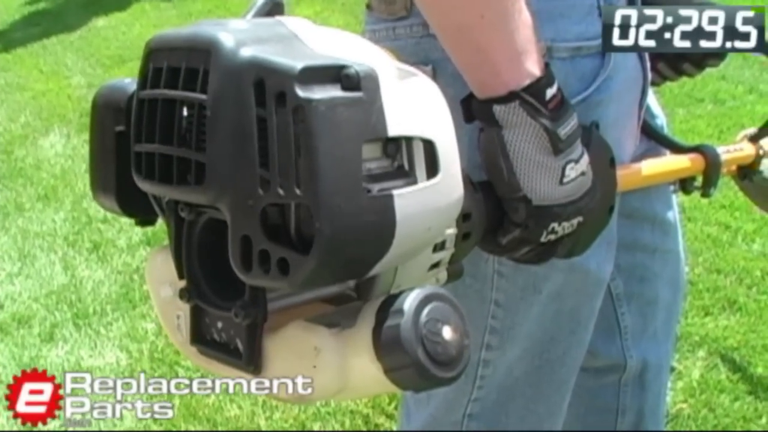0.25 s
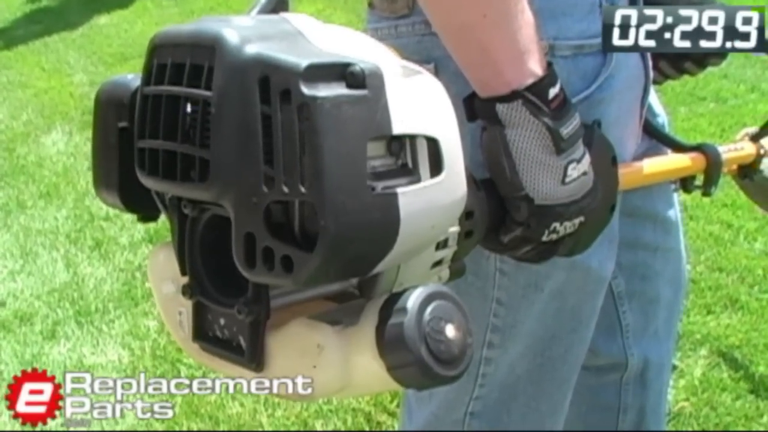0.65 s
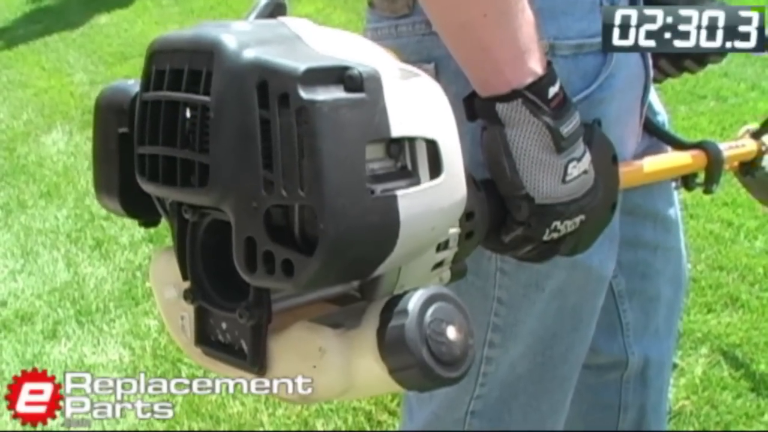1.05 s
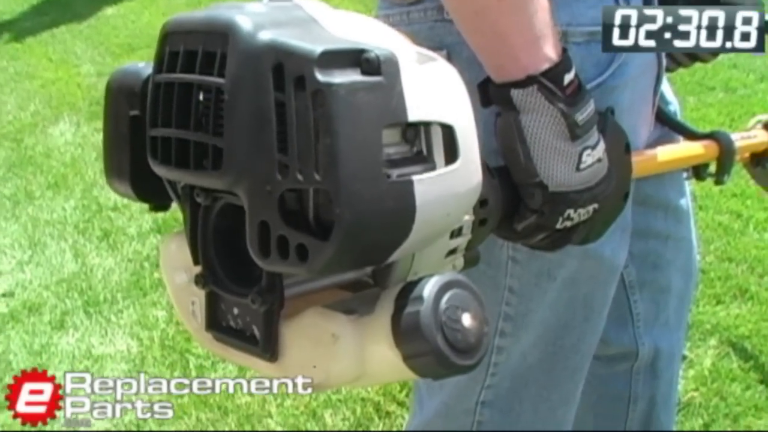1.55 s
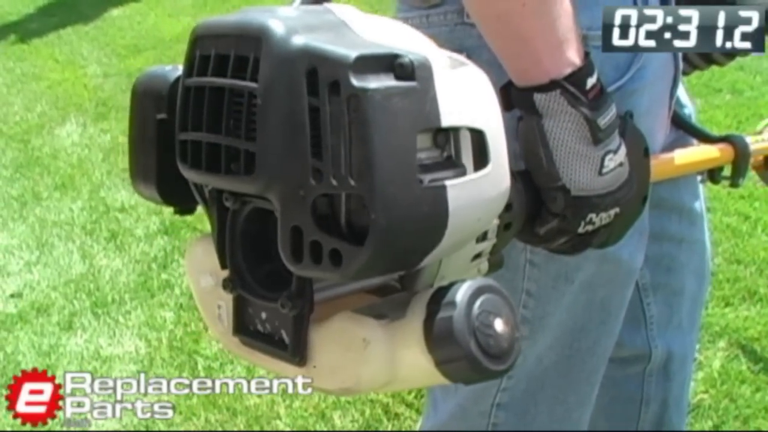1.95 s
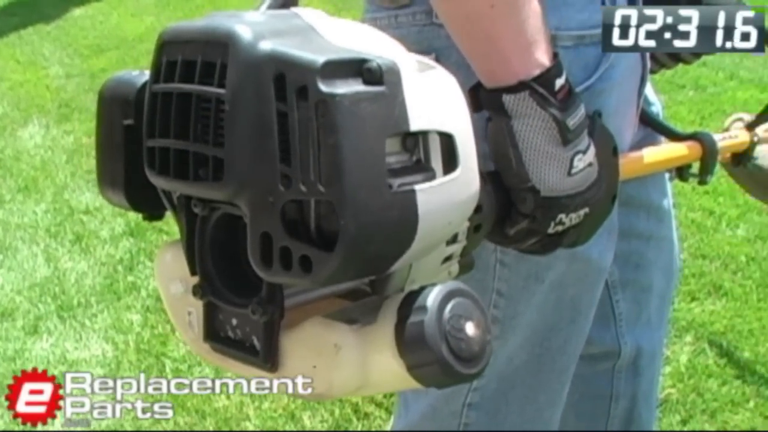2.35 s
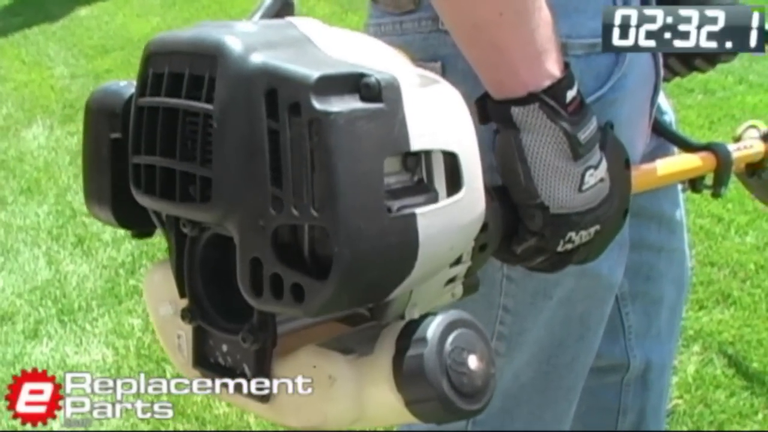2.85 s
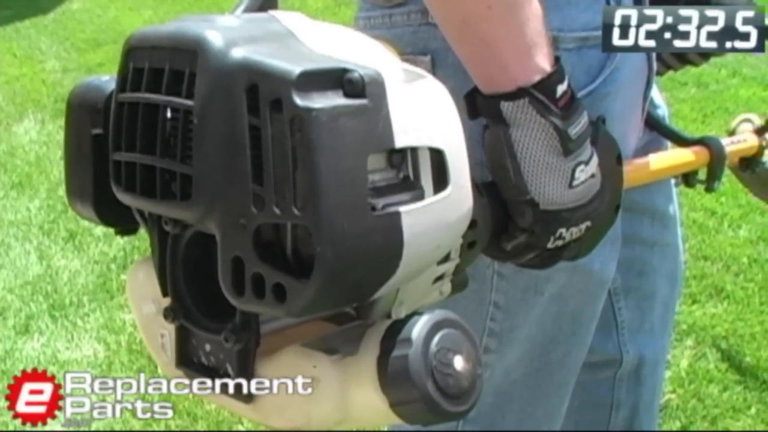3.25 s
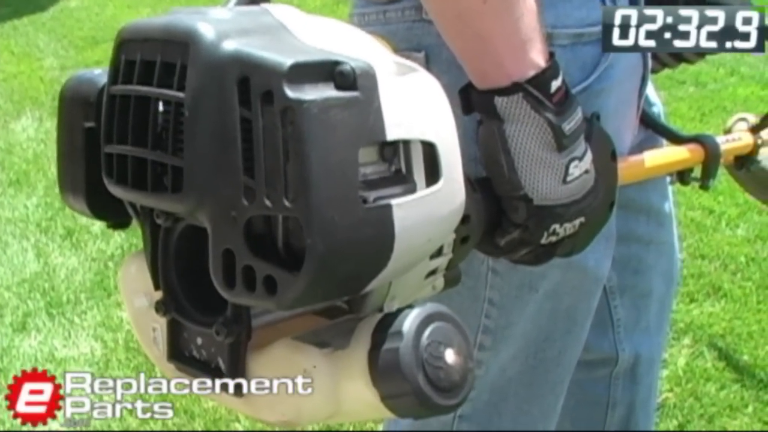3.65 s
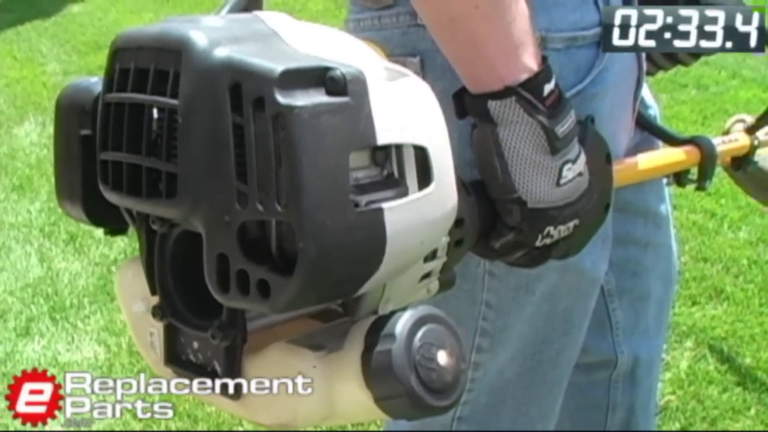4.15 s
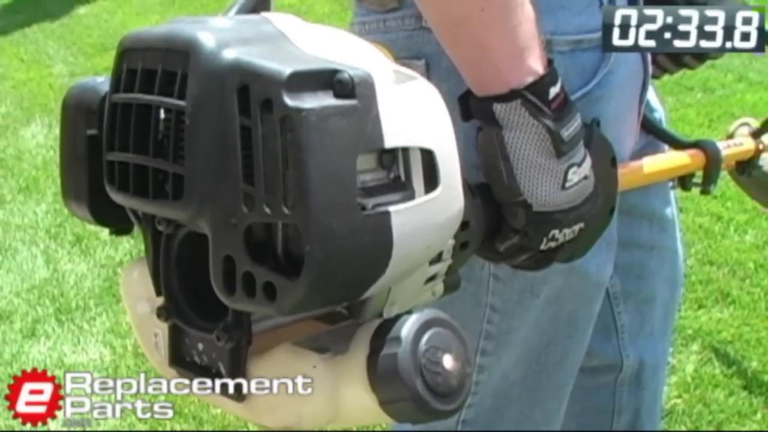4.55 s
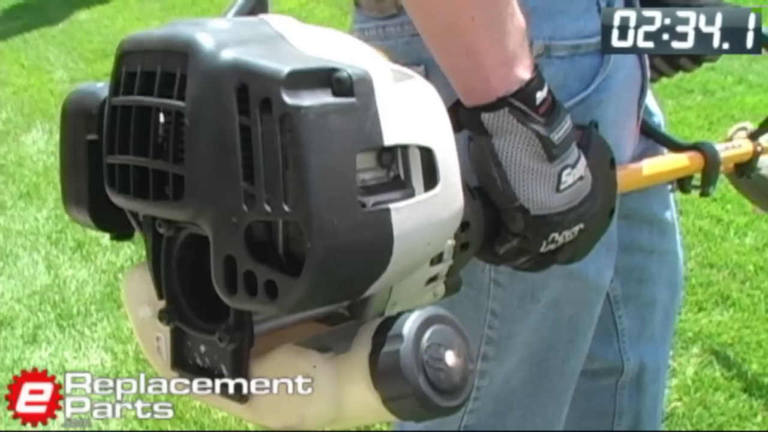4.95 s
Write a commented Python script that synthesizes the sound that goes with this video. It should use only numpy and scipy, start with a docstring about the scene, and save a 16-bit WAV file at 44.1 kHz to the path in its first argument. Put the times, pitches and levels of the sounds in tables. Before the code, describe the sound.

A string trimmer runs with a raspy drone outdoors, slows a little, then cuts out and clatters to a halt.

```python
"""A hand-held two-stroke trimmer runs on a lawn, close to a camera. Each turn gives a steep-fronted exhaust
pulse, a rush of gas and knocks that ring the crankcase and its plastic shroud. The muffler spits, the
speed sags and the cooling fins sing. Switched off, the engine rattles, coasts down against friction and
stops with a kick. In the quiet afterwards a hand shifts on the grip, and the camera's gain control
brings up the distant outdoor hum."""
import sys
import numpy as np
from scipy import signal
from scipy.fft import rfft, irfft
from scipy.io import wavfile
from scipy.ndimage import uniform_filter1d, minimum_filter1d

SR = 44100
rng = np.random.default_rng(int(sys.argv[2]) if len(sys.argv) > 2 else 0)


def log_audio(samples):
    """Write samples as a 16-bit WAV file to the path given in sys.argv[1]."""
    # one column per channel
    frames = np.atleast_2d(samples).T
    # limit to full scale, then quantise
    limited = np.clip(frames, -1, 1)
    pcm = np.round(limited * 32767).astype(np.int16)
    wavfile.write(sys.argv[1], SR, pcm)


N = 229757
TIME = np.arange(N) / SR
FFT_SIZE = 16384
FREQ = np.arange(FFT_SIZE // 2 + 1) * SR / FFT_SIZE
SWITCH_OFF_S, STOP_S = 4.14, 4.716


def undb(db):
    """Amplitude ratio of a level in decibels."""
    return 10 ** (np.asarray(db) / 20)

def unit(x):
    """Normalisation to an rms of 1."""
    return x / np.sqrt(np.mean(x ** 2))

def ramp(start_s, length_s):
    """Linear rise from 0 to 1."""
    return np.clip((TIME - start_s) / length_s, 0, 1)

def spectrum(points):
    """Interpolation of (f/Hz, level/dB) points on a logarithmic frequency axis."""
    hz, db = np.transpose(points)
    return np.interp(np.log(FREQ + 1), np.log(hz + 1), db)

def causal(db):
    """Minimum phase: the response with these levels that rings only after it is struck."""
    cepstrum = irfft(np.log(undb(db)))
    half = len(cepstrum) // 2
    cepstrum[1:half] *= 2
    cepstrum[half + 1:] = 0
    return np.exp(rfft(cepstrum))

def modes(table):
    """Modal superposition: the summed response of damped resonators."""
    return sum(undb(db) * 1j * FREQ * width / (hz ** 2 - FREQ ** 2 + 1j * FREQ * width)
               for hz, width, db in table)

def band(low_hz, top_hz):
    """Band-pass response: first order below, second order above."""
    return 1j * FREQ / (low_hz + 1j * FREQ) / (1 + (FREQ / top_hz) ** 2)

def filtered(x, response, lead=512):
    """Convolution of a sound with the impulse response of a filter."""
    taps = np.roll(irfft(response), lead, axis=-1)
    return signal.oaconvolve(np.atleast_2d(x), np.atleast_2d(taps), axes=-1)[:, lead:lead + N]

def stereo_noise(apart, count=N):
    """Partial coherence: common noise plus a share of opposite sign in the two channels."""
    mid, side = rng.standard_normal((2, count))
    return mid + apart * side * np.array([[1], [-1]])

def decay(t60):
    """Exponential decay by 60 dB in t60 seconds."""
    return np.exp(-np.log(1000) * TIME[:FFT_SIZE] / t60)

def bursts(table, t60, apart):
    """Transient noise: a sharp onset at each (t/s, level/dB), then exponential decay."""
    envelope = np.zeros(N + FFT_SIZE)
    for onset_s, db in table:
        start = int(onset_s * SR)
        envelope[start:start + FFT_SIZE] += undb(db) * decay(t60)
    return stereo_noise(apart) * envelope[:N]

def clicks(times, sizes):
    """Band-limited impulses: windowed sinc pulses, placed between the samples."""
    centres = np.asarray(times)[:, None] * SR
    taps = centres.astype(int) + np.arange(-7, 9)
    pulses = sizes[:, None] * np.sinc(taps - centres) * np.sinc((taps - centres) / 9)
    out = np.zeros(N)
    np.add.at(out, np.clip(taps, 0, N - 1), pulses)
    return out

def scatter(t60, apart):
    """All-pass scattering: dense, brief reflections smear a click without colouring it."""
    tail = rfft(stereo_noise(apart, count=FFT_SIZE) * decay(t60))
    return tail / np.abs(tail)

def passages(turns, angle):
    """Cyclic variation: the times the crank passes an angle, with random deviates of timing and level."""
    times = np.interp(np.arange(int(turns[-1])) + angle, turns, TIME)
    times = times[times < STOP_S]
    shift, size = rng.standard_normal((len(times), 2)).T
    return times, shift, size


# spectrum of the outdoor background: f/Hz, level/dB
AMBIENT_SPECTRUM = [(30, -44), (80, -17), (130, -12.5), (180, -3), (300, -8.5), (700, -9), (1200, -7),
                    (1800, -14), (4000, -14), (7400, -16.5), (12000, -28.5), (16000, -42)]
def outdoors(level_db=-49.5):
    """Ambient noise: distant hum and hiss, with a slight random amplitude modulation."""
    flutter_db = unit(uniform_filter1d(rng.standard_normal(N), size=900))
    hum = filtered(stereo_noise(apart=0.35), undb(spectrum(AMBIENT_SPECTRUM)))
    return unit(hum) * undb(level_db + flutter_db)

# shifts of the hand on the grip: t/s, level/dB
GRIP_SHIFTS = [(4.923, -39), (5.118, -66), (5.138, -43), (5.19, -43)]
def rustles():
    """Friction noise: the hand rustles faintly, in the same broad band as the gas."""
    return filtered(bursts(GRIP_SHIFTS, t60=0.097, apart=0.62), undb(spectrum(GAS_SPECTRUM)))

# lightly damped modes of the cooling fins: f/Hz, bandwidth/Hz, level/dB
FIN_MODES = [(1838, 30, 0), (1816, 6, -4), (4325, 7, -10), (4646, 14, -17)]
def fins(turns, hz, critical_hz=113.9, width_hz=1.15, critical_db=4, jitter_s=3e-5, rough_db=2.1):
    """Resonance: the fins sing when a harmonic of the crank meets a mode, and after the hardest kick."""
    times, shift, size = passages(turns, angle=0.3448)
    # near the critical speed the engine shakes in sympathy and strikes them harder
    sympathy = np.exp(-((np.interp(times, TIME, hz) - critical_hz) / width_hz) ** 4)
    blows = clicks(times + jitter_s * shift, undb(critical_db * sympathy + rough_db * size))
    kick_s, kick_db = max(PISTON_KICKS, key=lambda kick: kick[1])
    blows += clicks([kick_s], undb([kick_db + 13]))
    return unit(filtered(blows, modes(FIN_MODES))) * undb(-33.3)

# spits of the muffler: t/s, level/dB
MUFFLER_SPITS = [(0.6335, -17), (0.8445, -13), (1.297, -12), (1.6344, -11), (1.6756, -12), (1.9235, -12),
                 (1.9325, -11), (1.9929, -12), (2.0944, -15)]
def spits():
    """Transient jet noise: short bright bursts leave the muffler outlet."""
    return filtered(bursts(MUFFLER_SPITS, t60=.03, apart=.4), band(4000, 12000)) * undb(-2.5)

# modes of the loose parts: f/Hz, bandwidth/Hz, level/dB
LOOSE_MODES = [(1340, 350, 2.5), (1880, 62, -6), (3510, 120, -3), (4560, 220, -3), (5380, 150, -2),
               (11500, 560, -15)]
def rattle(turns, angle=.35, settle_turns=0.5, steady=0.6, jitter_s=3e-5, rough_db=1.5):
    """Impacts across a clearance: as firing falters, loose parts clack once a turn, chatter and settle."""
    times, shift, size = passages(turns, angle)
    ring = modes(LOOSE_MODES)
    impacts = clicks(times + jitter_s * shift, undb(rough_db * size))
    clack = filtered(impacts, ring * scatter(t60=.012, apart=.3))
    settling = steady + np.exp(-((turns - angle) % 1) / settle_turns)
    chatter = filtered(stereo_noise(apart=0.25) * settling, ring)
    return unit(unit(clack) + undb(-3) * unit(chatter)) * undb(-24.5) * ramp(SWITCH_OFF_S, .1)

# last blows of the piston: t/s, level/dB
PISTON_KICKS = [(4.709, -6), (4.727, -5), (4.74, -16)]
def kicks(body):
    """Air-spring rebound: the piston rocks back from compression, shaking loose parts and casing."""
    response = undb(-9) * modes(LOOSE_MODES) + undb(-24) * body * causal(spectrum(GAS_SPECTRUM))
    return filtered(bursts(PISTON_KICKS, t60=0.11, apart=0.27), response)

# modes of crankcase and shroud: f/Hz, bandwidth/Hz, level/dB
CASING_MODES = [(1447, 290, -1), (2570, 153, 1.5), (3294, 36, -1), (3713, 220, -6.5), (4280, 86, -8),
                (5380, 24, 5), (5720, 310, -2.5), (6800, 280, 3), (7280, 49, 6.5), (9170, 60, 6),
                (11270, 260, 3), (11860, 330, -14)]
def casing():
    """Structural resonance: the modes of the casing add to the direct sound."""
    return 1 + modes(CASING_MODES)

# knocks of piston, rings and clutch: crank angle/turns, level/dB
KNOCK_ANGLES = [(0.192, -17.5), (0.348, -2), (.45, 5), (0.556, -3), (0.799, 4), (.93, -7)]
# spectrum of a knock: f/Hz, level/dB
KNOCK_SPECTRUM = [(100, -61), (700, -16), (1200, -14.5), (1600, -1), (2100, 0.5), (3000, -1.5), (4500, 1.5),
                  (6000, -7.5), (8000, -22.5), (12000, -30), (16000, -14)]
def knocks(turns, firing, body, jitter_s=1.8e-5, loose_s=1e-5, rough_db=1.5):
    """Impact excitation: each knock takes its own path through the shroud; unfired, its timing loosens."""
    response = body * causal(spectrum(KNOCK_SPECTRUM))
    out = 0
    for angle, db in KNOCK_ANGLES:
        times, shift, size = passages(turns, angle)
        slack_s = jitter_s + loose_s * (1 - np.interp(times, TIME, firing))
        impacts = clicks(times + slack_s * shift, undb(db + rough_db * size))
        out = out + filtered(impacts, response * scatter(t60=0.0061, apart=0.24))
    return unit(out)

# spectrum of the rushing gas: f/Hz, level/dB
GAS_SPECTRUM = [(30, -16.5), (90, -23.5), (200, -22.5), (350, -16.5), (600, -13.5), (1000, 1), (1500, -3.5),
                (2200, -3.5), (4000, 0.5), (6000, -3), (8000, -7), (10000, -9.5), (12000, -9), (16000, -27)]
def gas(turns, body, open_angle=0.3, open_turns=0.25, fan=0.48, rough_db=1.5):
    """Turbulence: gas rushes out while the port is open, over the steady hiss of the cooling fan."""
    puff = np.exp(-(np.sin(np.pi * (turns - open_angle)) / (np.pi * open_turns)) ** 2)
    size = undb(rough_db * rng.standard_normal(int(turns[-1]) + 1))[turns.astype(int)]
    flow = stereo_noise(apart=0.37) * (fan + puff * size)
    return unit(filtered(flow, body * causal(spectrum(GAS_SPECTRUM))))

def shock(turns, firing, jitter_s=5e-5, rough_db=4.5):
    """Nonlinear steepening: the front of each firing pulse is a narrow spike of varying height."""
    times, shift, size = passages(turns, angle=.185)
    spikes = clicks(times + jitter_s * shift, undb(rough_db * np.minimum(size, 1.6)))
    return unit(filtered(spikes * firing, band(900, 3000)))

# crank speed when coasting, sagging and fast: f/Hz
STATE_SPEEDS = [96, 113, 122]
# exhaust harmonics: order, then level/dB when coasting, sagging and fast
EXHAUST_HARMONICS = [(1, -36, -16, -14), (2, -16, -10.5, -17.5), (3, -13, -7.5, -4.5), (4, -12, -9.5, -10),
                     (5, -8, -3, -1), (6, -11, -7, -7), (7, -17, -6.5, -2), (8, -13, -0.5, 0),
                     (9, -9, -7, -6), (10, -14, -13, -10), (11, -7, -3.5, -11), (12, -12, -3.5, -12),
                     (13, -11, -8, -21), (14, -13, -17, -13)]
def exhaust(turns, hz, firing, delay_turns=.05, dispersion_turns=.008, rough_db=.6):
    """Dispersion: the muffler lets the lows out first, so each turn's pulse is a short upward chirp."""
    deviates = rng.standard_normal((int(turns[-1]) + 2, 2))
    size, shift = (np.interp(turns, np.arange(len(d)), d) for d in deviates.T)
    jitter_turns = (.0015 + .004 * (1 - firing)) * shift
    # minimum phase of the sagging spectrum, extended by a falling tail
    sagging_db = np.transpose(EXHAUST_HARMONICS)[2]
    phase = np.unwrap(np.angle(causal(np.r_[-30, sagging_db, np.linspace(-14, -40, num=34)])))
    out = 0
    for order, *levels in EXHAUST_HARMONICS:
        angle = turns + jitter_turns - delay_turns - dispersion_turns * order
        amplitude = undb(np.interp(hz, STATE_SPEEDS, levels))
        out = out - amplitude * np.cos(2 * np.pi * order * angle + phase[order])
    return unit(out * undb(rough_db * size))

# crank speed while the engine fires: t/s, f/Hz
CRANK_SPEED = [(0.05, 123.4), (0.28, 123.7), (0.43, 121.8), (1.01, 123.7), (1.16, 123.7), (1.34, 122.1),
               (1.39, 122.4), (1.7, 120.0), (1.84, 116.0), (1.93, 115.0), (2.18, 114.1), (2.37, 115.2),
               (2.48, 114.6), (2.66, 110.8), (2.87, 112.2), (3.09, 111.9), (3.37, 114.0), (4.12, 112.7)]
def crank(dying_s=.22, friction_hz_per_s=123):
    """Dry friction: once the firing has died away, a constant torque slows the crank at a steady rate."""
    coasting = ramp(SWITCH_OFF_S, dying_s)
    hz = np.interp(TIME, *np.transpose(CRANK_SPEED)) - friction_hz_per_s * np.cumsum(coasting) / SR
    return np.maximum(hz, np.interp(STOP_S, TIME, hz)), 1 - coasting

# left microphone port relative to right: f/Hz, phase lead/rad
PHASE_DIFFERENCE = [(0, 0), (950, 0.7), (1980, 0.4), (3790, 0.6), (5080, 0.3), (5600, -0.1), (6200, 0.0),
                    (7320, -0.4), (8270, -0.3), (9990, 0.5), (10200, 0.5), (12400, 0.7), (13600, 0.2),
                    (15600, 0.0)]
# left microphone port relative to right: f/Hz, level/dB
LEVEL_DIFFERENCE = [(60, 0.5), (110, 0.5), (200, 0.0), (380, 0.0), (700, -0.5), (1290, -0.5), (2380, 0.5),
                    (4400, 2.5), (8120, -0.5), (15000, -1.5)]
def microphones(x):
    """Path difference: a near source reaches the two microphone ports with unequal phase and level."""
    lead = np.interp(FREQ, *np.transpose(PHASE_DIFFERENCE))
    half = (1j * lead + np.log(undb(spectrum(LEVEL_DIFFERENCE)))) / 2
    return filtered(x, np.exp(np.array([half, -half])))

def scene(pumping_hz=71):
    """Superposition: the crank drives the engine's layers until it stops, over the outdoor hum."""
    hz, firing = crank()
    turns = np.cumsum(hz) / SR
    _, sagging_hz, fast_hz = STATE_SPEEDS
    # as the engine sags and labours, the exhaust swells, its front softens and the knocks harden
    sag = np.interp(hz, [sagging_hz, fast_hz], [1, 0])
    # below pumping_hz the piston pumps ever less air through the muffler
    exhaust_db = -25.5 + 0.63 * sag + 16 * np.minimum(np.log2(hz / pumping_hz), 0)
    shock_db = exhaust_db - 13.5 - 6.5 * sag
    # coasting, slack parts knock harder at first; knocks and gas then fade with the speed
    octaves_down = np.maximum(np.log2(sagging_hz / hz), 0)
    knock_db = -28.5 + 1.3 * sag + 2.5 * (1 - firing) - 1.5 * octaves_down
    gas_db = -25 - 4 * octaves_down
    body = casing()
    engine = exhaust(turns, hz, firing) * undb(exhaust_db) + shock(turns, firing) * undb(shock_db)
    engine = engine + knocks(turns, firing, body) * undb(knock_db)
    engine = engine + gas(turns, body) * undb(gas_db) + rattle(turns)
    turning = np.clip((STOP_S - TIME) / 0.041 + .5, 0, 1)
    near = engine * turning + rustles() + fins(turns, hz) + spits() + kicks(body)
    return microphones(near) + outdoors()

def gain_control(x, target_db=-26, release_db_per_s=20, boost_db=7, hold_s=.03):
    """Automatic gain control: loud sound holds the gain down; in quiet it climbs to its full boost."""
    power = uniform_filter1d(np.mean(x ** 2, axis=0), size=1000)
    excess_db = 10 * np.log10(power + 1e-12) + boost_db - target_db
    held_db = -minimum_filter1d(-np.clip(excess_db, 0, boost_db), int(2 * hold_s * SR) + 1)
    release_db = release_db_per_s * TIME
    cut_db = np.maximum.accumulate(held_db + release_db) - release_db
    return x * undb(boost_db - cut_db)

def record(dry, top_hz=15900):
    """Compression and band limiting: the camera rides its gain and cuts the highest treble."""
    return signal.sosfilt(signal.ellip(10, .2, 80, top_hz, fs=SR, output="sos"), gain_control(dry))


dry = scene()
out = record(dry)
log_audio(out)
```